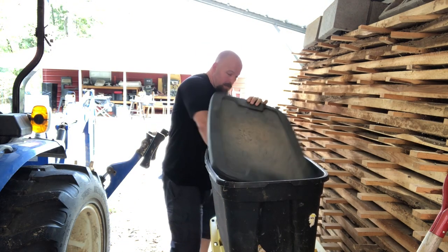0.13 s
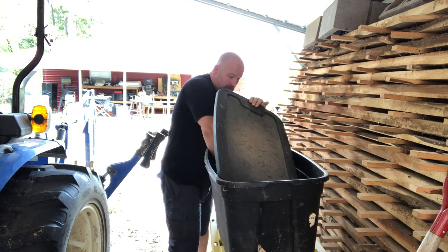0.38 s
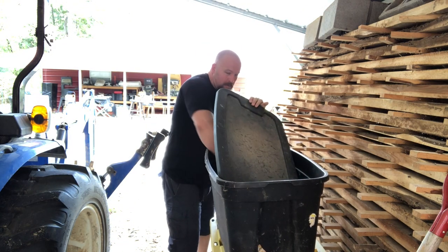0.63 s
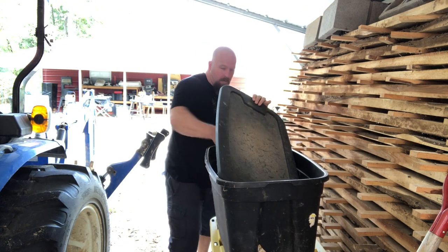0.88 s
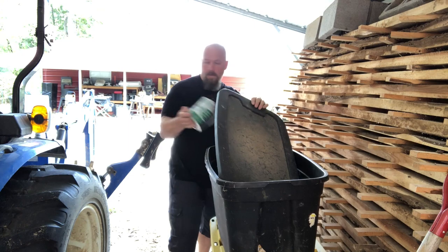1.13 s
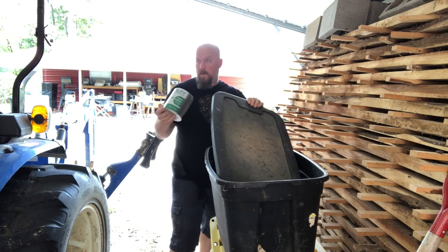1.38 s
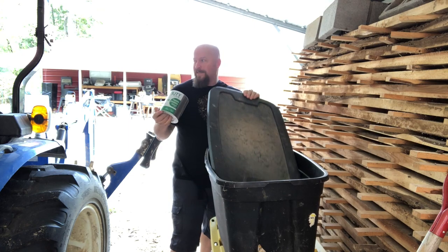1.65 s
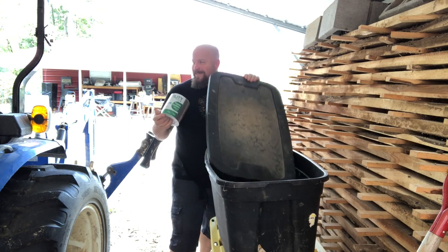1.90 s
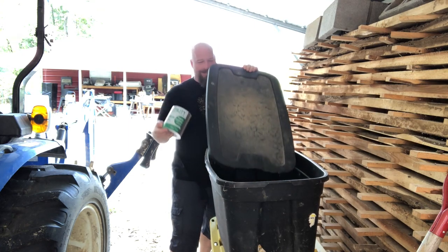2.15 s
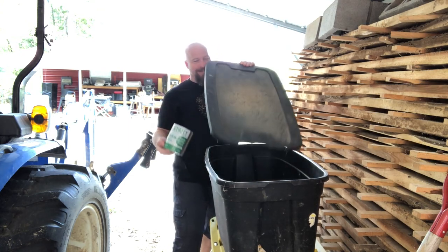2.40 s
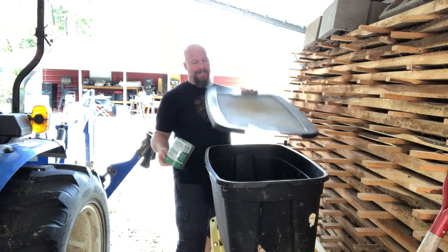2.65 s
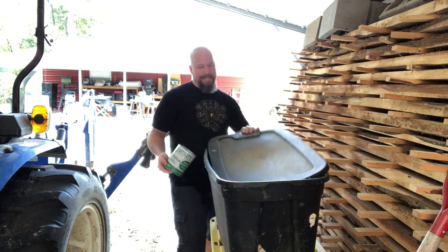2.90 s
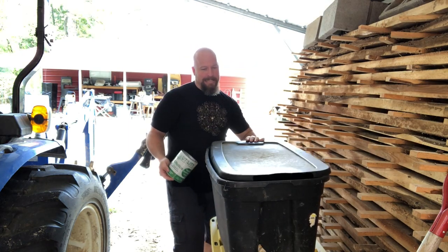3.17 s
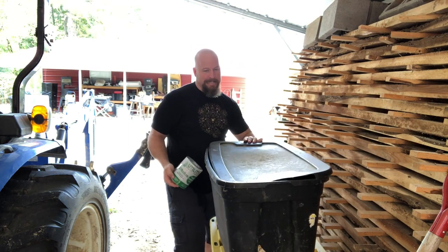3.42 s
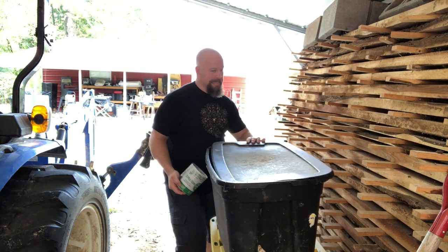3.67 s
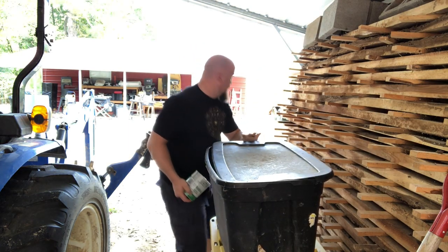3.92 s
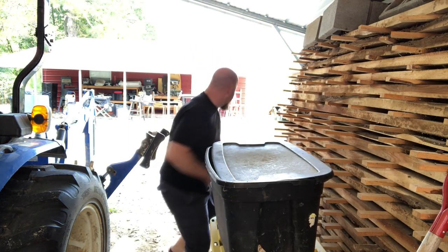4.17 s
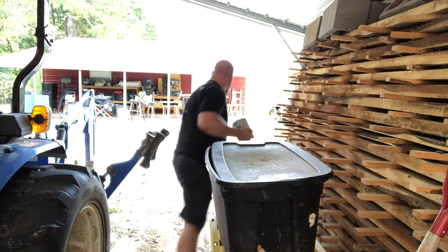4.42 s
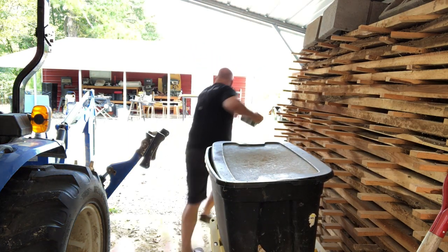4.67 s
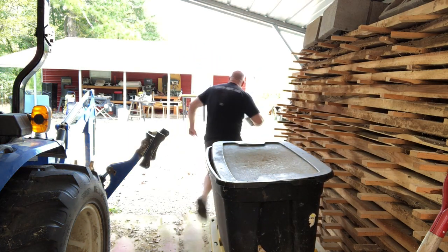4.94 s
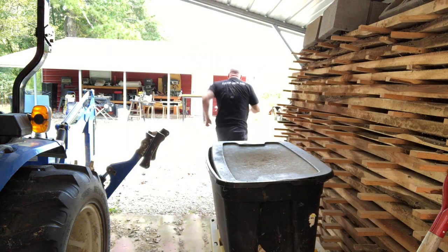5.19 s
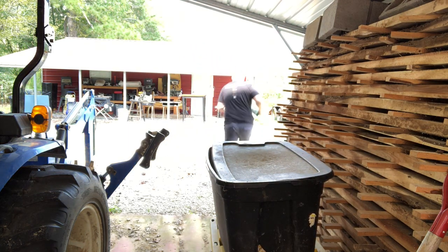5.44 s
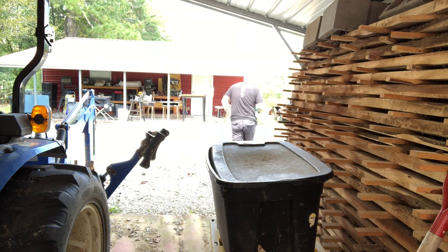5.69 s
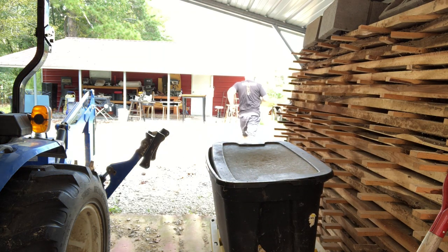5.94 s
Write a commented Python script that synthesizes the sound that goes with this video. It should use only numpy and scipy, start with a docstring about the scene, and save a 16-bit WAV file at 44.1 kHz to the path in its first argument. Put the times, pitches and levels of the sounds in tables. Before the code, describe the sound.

Close, dry mono sound in an open-sided shed with a short dull echo. A lid is tipped back with a brief groan and a sharp hollow bang; soft rustles and light tub rattles follow. After a quieter moment the lid claps shut, booming and bouncing before settling with small knocks. A quick rub, then stones clack and grind underfoot over faint high insect hiss.

```python
"""Plastic bin under an open shed

Someone rummages in a large plastic bin, drops its lid back so that it bounces, and walks off over gravel.
Knocks excite decaying wall modes with noisy cracks, and pushes rumble in the hollow.
Rubbing hands, plastic and soles are trains of random slips; stones clack, grind and crunch.
A faint groan, a rattling tub and a short wash from the shed join them.
Banded noise makes the insects' high hiss and a far twitter, over the rumble and hiss of the open air."""
import sys
import numpy as np
from scipy import signal
from scipy.fft import rfft, irfft, next_fast_len
from scipy.io import wavfile
from scipy.ndimage import uniform_filter1d

SR = 44100
rng = np.random.default_rng(int(sys.argv[2]) if len(sys.argv) > 2 else 0)


def wav_record(signal):
    """Record a signal, one row per channel, as 16-bit PCM in the file named by sys.argv[1]."""
    frames = np.transpose(np.atleast_2d(signal))
    bounded = np.clip(frames, -1, 1)
    # unit amplitude maps onto the largest positive 16-bit level
    quanta = np.round(bounded * 32767).astype(np.int16)
    wavfile.write(sys.argv[1], SR, quanta)


def volts_from_decibels(level):
    """Turn decibel levels (scalar or array-like) into linear amplitude factors."""
    exponent = np.asarray(level, float) / 20
    return 10 ** exponent


N = 267687
T = np.arange(N) / SR


def level(x, db):
    """Root-mean-square normalisation: scales to an rms level in dB."""
    return x * volts_from_decibels(db) / np.sqrt(np.mean(x ** 2))


def peak(x, db):
    """Peak normalisation: scales to a peak level in dB."""
    return x * volts_from_decibels(db) / np.abs(x).max()


def band(x, lo_hz, hi_hz, order=2):
    """Band limitation by a Butterworth band-pass."""
    edges_hz = [lo_hz, min(hi_hz, .49 * SR)]
    return signal.sosfilt(signal.butter(order, edges_hz, "bandpass", fs=SR, output="sos"), x)


def colour(x, points):
    """Spectral shaping: weights the spectrum by a curve through (Hz, dB) points."""
    hz, db = np.transpose(points)
    n = next_fast_len(len(x))
    bins_hz = np.arange(n // 2 + 1) * SR / n
    gain = volts_from_decibels(np.interp(np.log(bins_hz + 1), np.log(hz), db))
    return irfft(rfft(x, n) * gain, n)[:len(x)]


def walk(rate):
    """Slow random fluctuation: normal values held 1 / rate s and smoothed twice over that time."""
    k = int(SR / rate)
    held = np.repeat(rng.standard_normal(N // k + 1), k)
    return uniform_filter1d(uniform_filter1d(held, k), k)[:N]


def fade(t, t60):
    """Exponential decay: the level falls 60 dB in t60 s."""
    return np.exp(-np.log(1000) * t / max(t60, 1e-3))


def add(out, s, sound):
    """Superposition: mixes a sound in at time s."""
    i = int(s * SR)
    out[i:i + len(sound)] += sound[:N - i]


# Spectrum of the open air. Each row: frequency in Hz, relative density in dB per Hz.
AIR_SPECTRUM = [(18, -31.5), (30, -1.5), (115, 4.5), (179, -29), (303, -12.5), (822, -10.5), (2060, -27),
                (3490, -26), (5590, -28.5), (6550, -28.5), (7670, -11.5), (9220, -32), (16000, -30.5)]


def air():
    """Coloured noise: distant rumble and hiss whose level swells slowly."""
    swell_db = 1.14 * walk(3.48)
    return level(colour(rng.standard_normal(N), AIR_SPECTRUM) * volts_from_decibels(swell_db), -64)


def insects():
    """Band-limited noise: a far chorus fused into one high resonance, gently throbbing."""
    centre_hz, width_hz, rms_db = 7704, 634, -72
    throb_db = 1.3 * walk(42) + 1.3 * walk(1.47)
    noise = rng.standard_normal(N) * volts_from_decibels(throb_db)
    return level(band(noise, centre_hz - width_hz / 2, centre_hz + width_hz / 2), rms_db)


# Course of a faint, far twitter. Each row: time in seconds, centre in Hz, level in dB.
TWITTER_COURSE = [(0, 3310, -74.5), (0.148, 3230, -89.5), (1.898, 3647, -80), (2.25, 3570, -75.5),
                  (2.46, 3496, -79), (2.56, 3150, -85), (2.615, 3290, -78), (2.67, 3650, -76),
                  (2.72, 3504, -90), (2.82, 3470, -96), (2.871, 3536, -74), (3.1, 3545, -82.5),
                  (4.2, 3580, -80.5), (4.4, 3486, -80.5), (6.07, 3540, -94)]


def twitter():
    """Frequency and amplitude modulation: two smeared bands wander in pitch, one a little above the other."""
    s, hz, db = np.transpose(TWITTER_COURSE)
    voices = np.zeros(N)
    for ratio in (1, 1.1):
        pitch_hz = ratio * np.interp(T, s, hz) + 200 * walk(30)
        smear = walk(600) * volts_from_decibels(3 * walk(21))
        voices += np.sin(2 * np.pi * np.cumsum(pitch_hz) / SR) * smear
    return volts_from_decibels(np.interp(T, s, db)) * level(voices, 0)


# Groan of the lid's edge as it slides. Each row: time in seconds, pitch in Hz, level in dB.
GROAN_COURSE = [(0.0, 706, -73), (0.029, 825, -61), (0.06, 648, -56), (0.13, 807, -66)]


def groan():
    """Roughness by random amplitude modulation: one narrow tone that wavers in pitch."""
    s, hz, db = np.transpose(GROAN_COURSE)
    phase = 2 * np.pi * np.cumsum(np.interp(T, s, hz)) / SR
    roughness = walk(800)
    return volts_from_decibels(np.interp(T, s, db, -150, -150)) * level(np.sin(phase) * roughness, 0)


# Modes of the bin's walls; the first two also ring when the hollow is pushed.
# Each row: frequency in Hz, relative level in dB, undamped 60 dB decay time in seconds.
WALL_MODES = [(99.3, 3.5, 0.11), (149.4, 1.5, 0.42), (293.7, 6.5, 0.22), (332.4, 5, 0.13),
              (498.3, -4, 0.293), (632, 10.5, 0.068), (790, -7.5, 0.074), (805.5, 4.5, 0.08),
              (893, 6, 0.076), (990, 8, 0.045), (1122.5, 7, 0.07), (1239, 3.5, 0.11), (1455, 5, 0.064),
              (1814, -6, 0.029)]
# Resonances of air and panels. Each row: centre in Hz, width in Hz, relative level in dB.
HOLLOW_BANDS = [(104.6, 38, 2), (161.6, 59, 7), (292.3, 15, -1), (235, 60, 2.5)]
# Pushes of hand, lid or foot. Each row: loudest moment in seconds, rumble level in dB, rise in seconds,
# 60 dB decay time in seconds, peak ring of the low modes in dB relative to the rumble level.
HOLLOW_PUSHES = [(0.252, -49, 0.11, 1.2, -8), (0.359, -37.5, 0.052, 0.5, -15),
                 (0.445, -39.5, 0.03, 0.19, -2), (0.639, -55.5, 0.05, 1.3, 3), (1.696, -56, 0.26, 2.7, 0.5),
                 (2.922, -36.5, 0.032, 0.3, -5), (3.059, -39, 0.152, 0.34, -4),
                 (3.179, -43, 0.14, 0.4, 12.5), (3.255, -54.5, 0.032, 1.29, 20.5),
                 (3.448, -49, 0.256, 0.14, 6.5), (3.66, -52.5, 0.105, 0.9, -6),
                 (3.798, -51.5, 0.021, 0.38, -1.5), (4.97, -56.5, 0.0096, 0.87, -14),
                 (5.31, -53.5, 0.053, 0.364, 1), (5.608, -55, 0.014, 0.525, -22)]


def hollow():
    """Forced resonance: slow pushes shake air and panels and leave the lowest modes ringing."""
    rest_db = -65.5  # the hollow hums faintly with the far rumble
    push = rng.standard_normal(N)
    rumble = np.zeros(N)
    for hz, width, db in HOLLOW_BANDS:
        rumble += level(band(push, hz - width / 2, hz + width / 2, order=1), db)
    power, rings, t = volts_from_decibels(rest_db) ** 2, np.zeros(N), T[:int(.6 * SR)]
    for s, db, rise, t60, ring_db in HOLLOW_PUSHES:
        onset = np.clip(1 + (T - s) / rise, 0, 1)
        power = power + (volts_from_decibels(db) * onset * fade(np.maximum(T - s, 0), t60)) ** 2
        phases, bend = 2 * np.pi * rng.random(2), 1 + .015 * rng.standard_normal()
        ring = np.zeros(len(t))
        for (hz, mode_db, mode_t60), phase in zip(WALL_MODES[:2], phases):
            swell = (1 - np.exp(-t * hz / 0.62)) * fade(t, mode_t60)
            ring += volts_from_decibels(mode_db) * swell * np.sin(2 * np.pi * hz * bend * t + phase)
        add(rings, s - .01, peak(ring, db + ring_db))
    return np.sqrt(power) * level(rumble, 0) + rings


# Modes of the lid's stiff rim.
# Each row: frequency in Hz, relative level in dB, undamped 60 dB decay time in seconds.
RIM_MODES = [(2566, -8, 0.27), (3040, 4, 0.13), (3220, -5.5, .1), (3300, 22.5, 0.02), (4330, -5, 0.054),
             (5230, 4, 0.021), (6730, -3.5, 0.026)]
# Knocks on bin and lid. Each row: time in seconds, peak of the wall sound in dB,
# crack in dB relative to that peak, strongest ring in Hz, damping factor.
BIN_KNOCKS = [(0.086, -45.5, -4, 368, 0.63), (0.136, -41.5, -14, 875, 1.53), (0.152, -40, -13, 770, 2.7),
              (0.191, -32, -25, 790, 2), (0.312, -13.5, -3, 740, 1.37), (0.364, -31, -2.5, 970, 2.2),
              (0.433, -33, -3, 790, 2.6), (0.616, -40.5, -19, 900, 3), (0.628, -40.5, -30, 298, 4.6),
              (0.846, -49, -38, 940, 2.8), (1.657, -40.5, -4, 1200, 1.2), (1.661, -40.5, -16, 258, 5.3),
              (1.724, -45, 5.5, 1390, 2.5), (1.985, -38.5, -42, 768, 2.44), (2.074, -47.5, -1, 770, 0.81),
              (2.096, -47, -10, 990, 3.7), (2.187, -44, -4.5, 1460, 1.05), (2.901, -13.5, -3.5, 1060, 3.1),
              (2.906, -23.5, -40, 338, 2.6), (2.933, -25, -30, 1133, 1.83), (2.983, -42.5, 8.5, 2000, 4.3),
              (3.019, -15.5, -13.5, 1150, 3.27), (3.169, -19.5, -6.5, 334, 3.74),
              (3.221, -39.5, -4.5, 2400, 1.12), (3.33, -38.5, -51, 1010, 1.2), (3.389, -37, -16, 830, 2),
              (3.404, -32, -30, 363, 2.91), (3.452, -38.5, -21, 816, 2), (3.577, -45.5, -16, 940, 1.1),
              (3.791, -41.5, -35, 300, 3.1)]


def knocks():
    """Modal excitation: a blow rings the modes near its spot, clatters, cracks, and booms below."""
    # light taps stay near their spot, hard blows wake the whole wall
    focus_db_per_oct, hard_db, extra_focus_per_db = 4.5, -24, 2.1
    boom_db, rim_level_db, rim_scatter_db = -28, -7, 1
    out, t = np.zeros(N), T[:int(.5 * SR)]
    hz, mode_db, t60 = np.array(WALL_MODES).T[:, :, None]
    rim_hz, rim_db, rim_t60 = np.array(RIM_MODES).T[:, :, None]
    low = hz < 250
    for s, db, crack_db, spot_hz, damp in BIN_KNOCKS:
        chance, noise = rng.standard_normal((3, len(hz), 1)), rng.standard_normal((3, len(t)))
        light_db = max(hard_db - db, 0)
        focus = focus_db_per_oct + extra_focus_per_db * light_db
        near_db = np.where(low, 0, -focus * np.abs(np.log2(hz / spot_hz)))
        gain = volts_from_decibels(mode_db + near_db) * volts_from_decibels(2 * chance[0])
        # bending waves spread slowly at low pitch, so low modes build up later
        swell = (1 - np.exp(-t * hz / 3.2)) * np.exp(-np.log(1000) * t * np.where(low, 1, damp) / t60)
        phase = 2 * np.pi * hz * (1 + 0.015 * chance[1]) * t + 3 * chance[2]
        rings = gain * swell * np.sin(phase)
        # thin walls hold many more modes than can be told apart: a noisy clatter, drawn towards 1 kHz
        rattle = (1 - np.exp(-t / 0.0016)) * (fade(t, 0.22 / damp) + 0.26 * fade(t, 0.2 / damp))
        middle_hz = np.sqrt(spot_hz * 1000)
        clatter = band(noise[0] * rattle, middle_hz / 1.8, middle_hz * 1.7)
        body = peak(rings[~low[:, 0]].sum(0), -1.74) + peak(clatter, -5.0)
        boom = rings[low[:, 0]].sum(0)
        # a blow on a slack, low-ringing spot has a duller crack
        brightness = 0.12 * (middle_hz / 1000) ** 2
        tick = band(noise[1] * fade(t, 0.031 / damp), 1350, 4570)
        tick = tick + brightness * band(noise[1] * fade(t, 0.039 / damp), 5100, 13000, order=1)
        buzz = band(noise[2] * fade(t, 0.26 / damp), 1240, 5430)
        edge = rng.standard_normal((2, len(rim_hz), 1))
        rim_gain = volts_from_decibels(rim_db + rim_scatter_db * edge[0])
        rim_decay = np.exp(-np.log(1000) * t * np.sqrt(damp) / rim_t60)
        rim_tone = np.sin(2 * np.pi * rim_hz * (1 + 0.0024 * edge[1]) * t)
        rim = (rim_gain * rim_decay * rim_tone).sum(0)
        crack = peak(tick + 0.37 * buzz, 0) + peak(rim, rim_level_db)
        add(out, s - .001, peak(body, db) + peak(boom, db + boom_db) + peak(crack, db + crack_db))
    return out


# Spectrum of the rubbing hiss. Each row: frequency in Hz, relative gain in dB.
HISS_SPECTRUM = [(1500, -11), (2600, 0), (4500, -4.5), (8000, -11.5), (16000, -26)]
# Two long rubs, the lid along the rim and a hand across the lid. Each row of a rub: time in seconds,
# scrape level in dB, hiss and chatter in dB relative to the scrape, chatter pitch in Hz.
LONG_RUBS = [
    [(1.33, -82, -4, 7, 794), (1.374, -57.5, -5.5, -1, 811.3), (1.64, -56, -0.5, -13, 858),
     (1.665, -55, -8, -7, 900), (1.808, -55, 0, 2, 653), (1.83, -64, 2, -10, 594),
     (1.878, -60, 2.5, -19.5, 580), (1.93, -67, -13, -14, 593)],
    [(3.805, -66, -23, -20, 1091), (3.815, -66, 4, -16.5, 1077), (3.839, -55, -0.5, 4.5, 1146),
     (3.865, -50.5, -2.5, -7, 1104), (3.885, -49.5, 0.5, 3, 1388), (3.905, -53, 3, 1, 1586),
     (3.945, -60, 2.5, 0, 1560), (3.985, -73, 4, -7, 1600)],
]
# Fine gravel shifting between the steps. Each row: time in seconds, scrape level in dB.
GRAVEL_SHUFFLE = [(4.45, -100), (4.65, -65.5), (4.9, -69), (5.15, -64.5), (5.45, -67), (6.07, -70)]
# Strokes of hands, plastic and soles. Each row: start in seconds, length in seconds,
# loudest moment as a share of the length (0-1), scrape level in dB, hiss in dB relative to the scrape.
SHORT_STROKES = [(0.195, 0.188, 0.4, -63, -16.5), (0.255, 0.044, 0.8, -56, -0.5),
                 (0.544, 0.031, 0.86, -59, -3), (0.703, 0.149, 0.05, -65, -4), (0.942, 0.096, 0, -65, -2),
                 (0.999, 0.096, 0.5, -60, -3), (2.019, 0.13, 0.67, -61.5, -2), (3.296, 0.1, 0, -53, -7.5),
                 (3.371, 0.037, 0.9, -50, -5), (3.727, 0.06, 0.8, -58, -4.5), (3.986, 0.16, 0, -56.5, -2.5),
                 (4.315, 0.19, 0.28, -65.5, 0.5), (4.439, 0.15, 0.42, -53.5, -5.5),
                 (4.946, 0.061, 0, -50, -6), (5.279, 0.11, 0.11, -52.5, -1.5),
                 (5.578, 0.076, 0.73, -55.5, -4), (5.679, 0.096, 0, -57.5, -2.5)]


def strokes():
    """Stick-slip friction: each patch of surface chatters in its own narrow band of random slips."""
    scrape_hz, shuffle_hiss_db = 1060, -2.5
    out, grain = np.zeros(N), np.zeros(N)
    for hz in 300 * 2 ** np.arange(0, 5.8, 1 / 3):
        slip_db = np.minimum(4 * rng.exponential(size=N), 11)
        slips = (rng.random(N) < 900 / SR) * volts_from_decibels(slip_db)  # about 900 a second
        patch = (level(slips, -2) + 1) * rng.standard_normal(N) * volts_from_decibels(3 * walk(45))
        grain = grain + band(patch, hz / 1.13, hz * 1.13)
    # a few larger grains snap across all bands at once
    snaps = (rng.random(N) < 120 / SR) * rng.standard_normal(N)
    grain = level(grain, 0) + level(band(snaps, 500, 6000, order=1), -11)
    hiss = level(colour(grain, HISS_SPECTRUM), 0)
    # the rubbed panel favours one pitch
    broad = band(grain, scrape_hz / 4.0, scrape_hz * 1.425)
    narrow = band(grain, scrape_hz / 1.57, scrape_hz * 1.1)
    scrape = level(broad + 0.06 * narrow, 0)

    judder_db, catches = 1.8 * walk(40), level(walk(800) * volts_from_decibels(8.6 * walk(70)), 0)
    for rub in LONG_RUBS:
        s, db, hiss_db, chatter_db, chatter_hz = np.transpose(rub)
        # the surface catches and lets go in a rough, narrow band that moves along the panel
        pitch_hz = np.interp(T, s, chatter_hz) * (1 + 0.1197 * walk(60))
        chatter = level(catches * np.sin(2 * np.pi * np.cumsum(pitch_hz) / SR), 0)
        rubbing = scrape + volts_from_decibels(np.interp(T, s, hiss_db)) * hiss
        rubbing = rubbing + volts_from_decibels(np.interp(T, s, chatter_db)) * chatter
        out += volts_from_decibels(np.interp(T, s, db, -150, -150) + judder_db) * rubbing

    shuffle_db = np.interp(T, *np.transpose(GRAVEL_SHUFFLE)) + 2.0 * walk(13)
    out += volts_from_decibels(shuffle_db) * (scrape + volts_from_decibels(shuffle_hiss_db) * hiss)

    for s, length, share, db, hiss_db in SHORT_STROKES:
        i, n = int(max(s, 0) * SR), int(length * SR)
        # a stroke starts abruptly, swells and stops
        points = [0, .04, np.clip(share, .05, .8), .85, 1]
        shape = np.interp(np.arange(n) / n, points, [0.104, 0.32, 1.0, 0.18, 0.34])
        add(out, max(s, 0), volts_from_decibels(db) * shape * (scrape[i:i + n] + volts_from_decibels(hiss_db) * hiss[i:i + n]))
    return out


# Modes of the small thin tub in the hand. Each row: frequency in Hz, relative level in dB.
TUB_MODES = [(900, 11.5), (1620, 11), (2620, 3.5), (3320, 0.5), (3950, -6.5), (5000, -3), (6200, -8)]
# Moments when the tub is brushed or jolted. Each row: time in seconds, peak in dB,
# 60 dB decay time of the excitation in seconds, favoured mode in Hz.
TUB_RATTLES = [(0.698, -47.5, 0.14, 3860), (0.732, -50.5, 0.16, 1620), (1.005, -49, 0.16, 3880),
               (3.577, -43, 0.15, 6150), (3.645, -47, 0.2, 2600)]


def tub():
    """Resonant filtering: a burst of tiny knocks rings a thin wall, each time with another balance of modes."""
    width_hz, scatter_db, favour_db = 260, 1.5, 8
    out, t = np.zeros(N), T[:int(.2 * SR)]
    mode_hz = np.transpose(TUB_MODES)[0]
    for s, db, t60, favoured_hz in TUB_RATTLES:
        ticks = rng.standard_normal(len(t)) * volts_from_decibels(2.8 * rng.exponential(size=len(t))) * fade(t, t60)
        nearness = np.exp(-(4 * np.log(mode_hz / favoured_hz)) ** 2)
        balance_db = scatter_db * rng.standard_normal(len(TUB_MODES)) + favour_db * nearness
        ring = np.zeros(len(t))
        for (hz, mode_db), shift_db in zip(TUB_MODES, balance_db):
            ring += volts_from_decibels(mode_db + shift_db) * band(ticks, hz - width_hz / 2, hz + width_hz / 2)
        add(out, s, peak(ring, db))
    return out


# Stones turned under the soles. Each row: time in seconds, peak of the ringing and grinding in dB,
# thud and grit in dB relative to that peak, pitch in Hz.
TURNED_STONES = [(3.935, -32.5, -32, -34, 1870), (3.993, -47.5, 0, -26.5, 434),
                 (4.125, -42, -10, -29.5, 1974), (4.362, -42.5, -8, -23, 1700),
                 (4.416, -58.5, 0, 13.5, 335), (4.459, -33, -15, -30, 1116), (4.493, -36, -14, -20, 1110),
                 (4.532, -32.5, -45, -17, 1710), (4.677, -47, -17, -25.5, 900),
                 (4.954, -30.5, -16.5, -15, 413), (5.136, -36.5, -41, -30, 439),
                 (5.298, -39, -27.5, 6.5, 560), (5.327, -34.5, -4.5, -6.5, 582),
                 (5.5, -39.5, -11, -13, 890), (5.592, -40, -22.5, -29, 625), (5.611, -32, -25, -6, 1110),
                 (5.695, -39.5, -10, -1, 937), (5.918, -40.5, -18, -9, 1085)]


def stones():
    """Impact and grinding: a stone clacks near its pitch, with grit above and the foot's weight below."""
    t60, ring_cycles = 0.074, 24  # grinding decay in seconds; longest ring in cycles per 60 dB
    out, t = np.zeros(N), T[:int(.3 * SR)]
    for s, db, thud_db, grit_db, hz in TURNED_STONES:
        noise = rng.standard_normal((3, len(t)))
        contact = 1 - np.exp(-t / .0016)
        ring = np.sin(2 * np.pi * hz * t) * fade(t, min(ring_cycles / hz, .5 * t60))
        grind = band(noise[0] * fade(t, t60), .6 * hz, 2.2 * hz)
        grit = band(noise[1] * fade(t, .5 * t60), 4700, 7900, order=1)
        thud = band(noise[2] * fade(t, 2 * t60), 71, 440)
        clack = peak(ring + peak(grind, -10.5), db)
        add(out, s - .001, contact * (clack + peak(grit, db + grit_db) + peak(thud, db + thud_db)))
    return out


def shed(x):
    """Reverberation by convolution: roof and stacked boards send back a short, dulling wash."""
    t60, wash_db = 0.259, -14  # seconds, dB relative to the direct sound
    t = T[:int(.5 * SR)]
    lower = band(rng.standard_normal(len(t)), 94, 2400, order=1) * fade(t, t60)
    upper = band(rng.standard_normal(len(t)), 1340, 9900, order=1) * fade(t, 0.5 * t60)
    wash = lower + 0.5 * upper
    wash = wash * (t > .006) / np.sqrt(np.sum(wash ** 2))  # first return after 6 ms
    return x + volts_from_decibels(wash_db) * signal.fftconvolve(x, wash)[:N]


def scene():
    """Superposition: near sounds in the shed over the far ones, on one channel."""
    near = hollow() + groan() + knocks() + strokes() + tub() + stones()
    far = air() + insects() + twitter()
    return (shed(near) + far)[None]


def band_limit(x):
    """A steep low-pass at the top of the band."""
    return signal.sosfilt(signal.butter(12, 16460, fs=SR, output="sos"), x)


def record(dry):
    """High-pass response: the microphone loses the deepest bass, below 42 Hz."""
    mix = signal.sosfilt(signal.butter(4, 42, "highpass", fs=SR, output="sos"), dry)
    return band_limit(mix)


dry = scene()
out = record(dry)
wav_record(out)
```